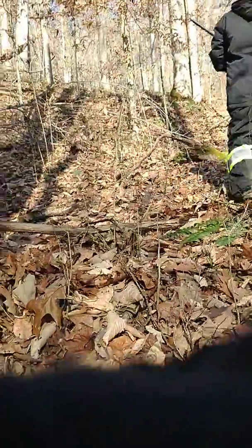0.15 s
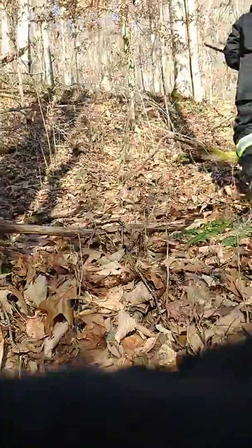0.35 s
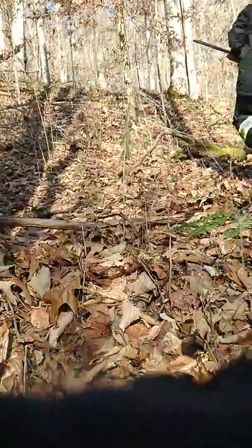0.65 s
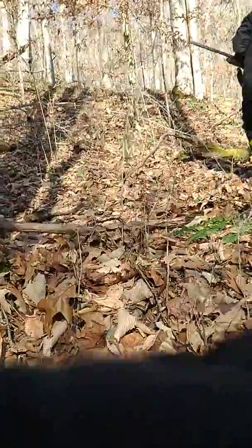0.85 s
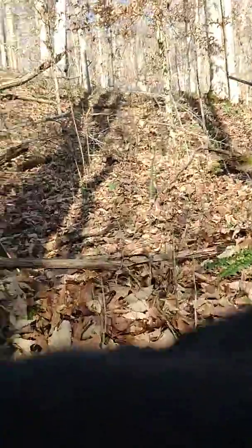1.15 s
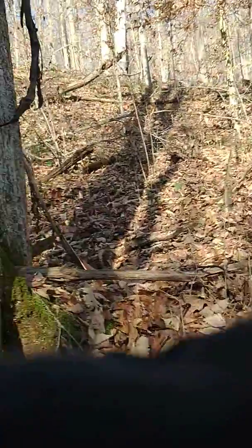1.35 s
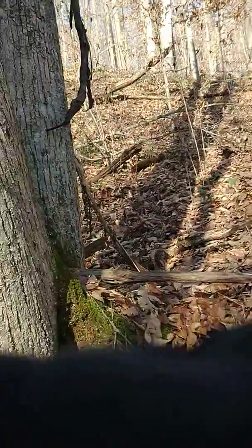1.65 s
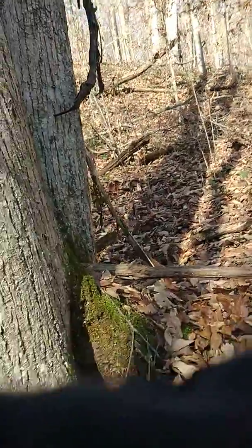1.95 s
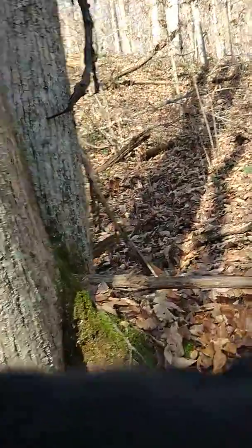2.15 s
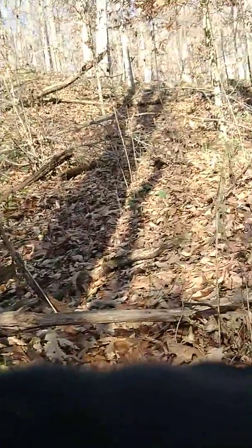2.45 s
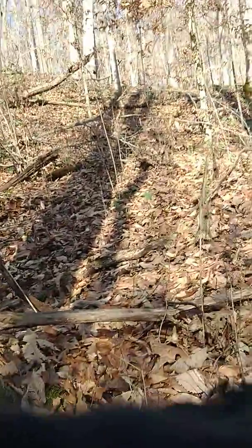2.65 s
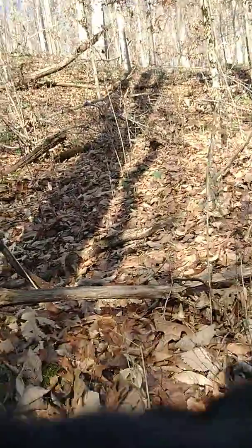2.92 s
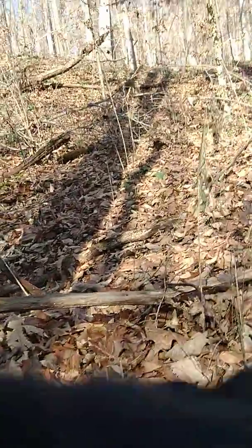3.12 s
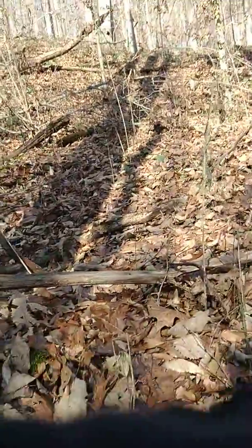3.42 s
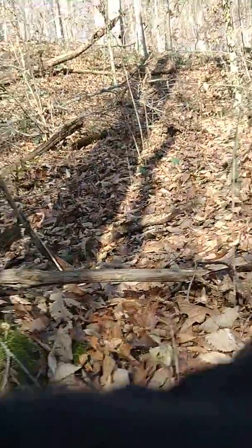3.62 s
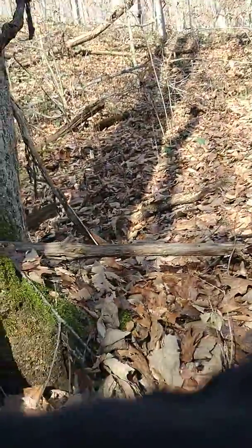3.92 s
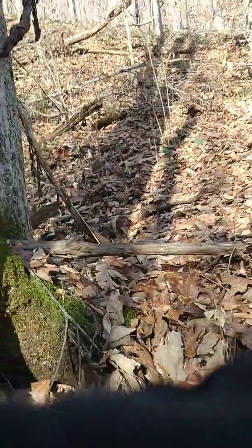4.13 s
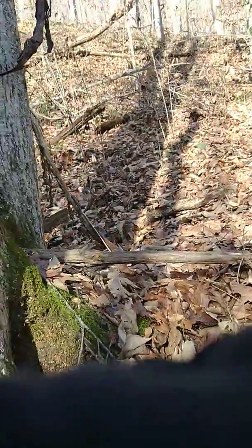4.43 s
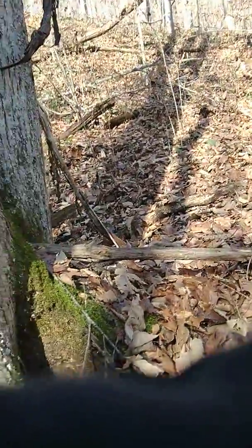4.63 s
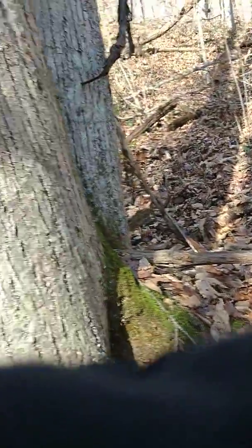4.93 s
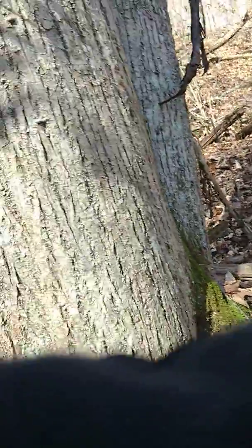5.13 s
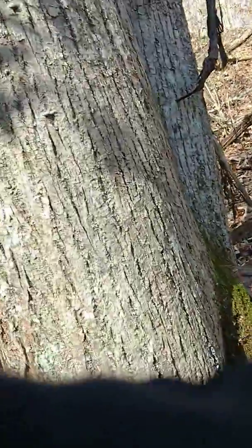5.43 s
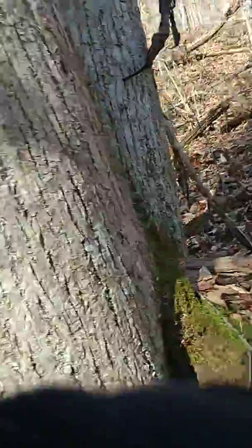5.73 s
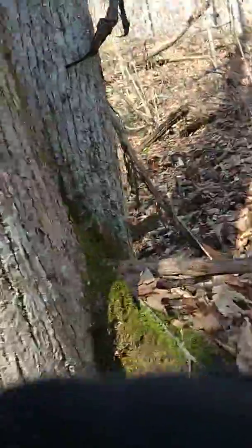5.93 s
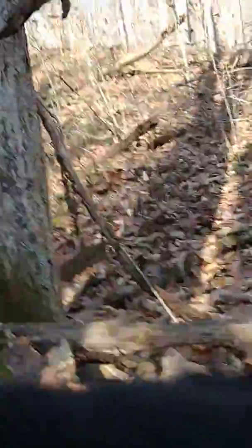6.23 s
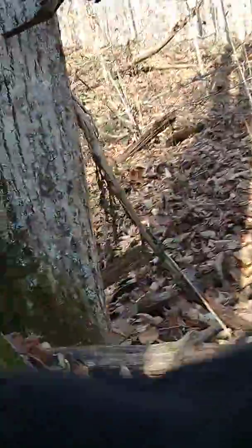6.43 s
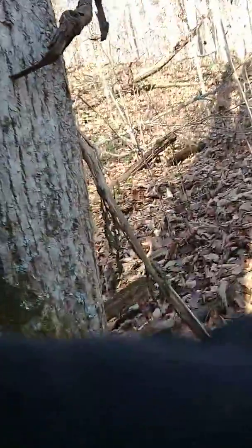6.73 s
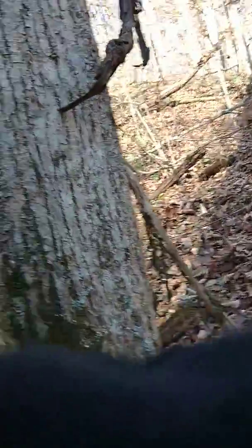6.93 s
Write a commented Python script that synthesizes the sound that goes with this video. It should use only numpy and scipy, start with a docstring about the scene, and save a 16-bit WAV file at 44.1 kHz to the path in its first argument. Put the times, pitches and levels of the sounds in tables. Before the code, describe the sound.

Uneven footsteps press and drag through brittle leaf litter, each a cluster of tiny bright fractures over a soft scuff. Sharp twig snaps and short hollow stick knocks stand out, while cloth slides and low hand bumps come from the camera itself, thickest around four seconds. Quiet forest air and a very faint short tree echo surround it; the stereo is wide, and the end is busiest.

```python
"""Shuffling through dry leaves, camera in hand

A forest floor underfoot, a camera held in a gloved hand. Each step crushes the litter into a dense
crackle of tiny fractures over a duller noise scuff; stalks snap as bursts, buried sticks knock as short tones.
The glove rubs and scrapes as shaped noise and bumps in low thuds, against the still air and a faint tree echo.
The camera's two microphones are cross-fed, each subtracting a delayed share of the other to widen the stereo."""
import sys
import numpy as np
from scipy import signal
from scipy.fft import rfft, irfft, next_fast_len
from scipy.io import wavfile
from scipy.ndimage import uniform_filter1d, map_coordinates

SR = 44100
rng = np.random.default_rng(int(sys.argv[2]) if len(sys.argv) > 2 else 0)


def materialize(psi):
    """Save the field psi as 16-bit PCM at rate SR to the path in sys.argv[1].

    A 1-D psi becomes a single channel; in a 2-D psi each row is a channel.
    """
    bounded = np.clip(np.atleast_2d(psi).T, -1, 1)
    quanta = np.round(bounded * 32767).astype(np.int16)
    wavfile.write(sys.argv[1], SR, quanta)


N = 311787

# Levels in the tables are relative: gains, filters and the microphones shift them further on.
# Boots pressing or dragging through the leaves. Each row: full weight at in seconds, rise by 20 dB in seconds,
# hold in seconds, release by 20 dB in seconds, crackle of the top leaves in dB, scuff of the packed litter in dB.
STEPS = [(-0.02, 0.19, 0.19, 0.15, -55, -49.5), (0.212, 0.1, 0.15, 0.14, -50, -50.5),
         (0.488, 0.11, 0.087, 0.21, -43.5, -45), (0.809, 0.084, 0.0058, 0.13, -51.5, -45),
         (0.918, .1, 0.13, 0.11, -63.5, -59), (1.098, 0.11, 0.33, 0.19, -51.5, -49.5),
         (1.328, 0.13, 0.01, 0.07, -45.5, -53.0), (1.596, 0.15, 0.094, 0.027, -52, -45),
         (1.777, 0.14, 0.024, 0.1, -39.5, -40), (2.012, 0.25, 0.4, 0.35, -51, -51.5),
         (2.531, 0.032, 0.038, 0.03, -35.5, -37.5), (2.598, .03, 0.018, 0.13, -57.5, -61),
         (2.865, 0.19, 0.051, 0.13, -53, -56), (2.998, 0.046, 0.088, 0.063, -55.5, -56.5),
         (3.222, 0.13, 0.17, 0.39, -55, -56), (3.486, 0.057, 0.012, 0.34, -45.5, -47.5),
         (3.878, 0.12, 0.059, 0.17, -45, -46), (3.988, 0.05, 0.15, 0.03, -55, -56),
         (4.265, 0.16, 0.069, 0.22, -43, -44.5), (4.517, 0.056, 0.11, 0.086, -40.5, -44.5),
         (4.817, 0.25, 0.067, 0.096, -57.5, -57.5), (5.133, 0.27, 0.1, 0.1, -53, -53),
         (5.254, 0.078, 0.065, 0.072, -39, -40), (5.463, 0.12, 0.06, 0.1, -54.5, -53),
         (5.56, 0.07, 0.064, 0.067, -46, -48), (5.792, 0.38, 0.18, 0.059, -57, -57.5),
         (5.995, 0.019, 0.14, 0.11, -50.5, -50.5), (6.185, 0.091, 0.053, 0.28, -46.5, -44.5),
         (6.343, 0.035, 0.035, 0.033, -40.5, -42), (6.446, 0.07, 0.029, 0.084, -40, -42.5),
         (6.507, .05, 0.062, 0.2, -49.5, -47.5), (6.672, 0.075, 0.054, 0.2, -45.5, -48.5),
         (6.844, 0.17, 0.078, 0.061, -40, -44.5), (7.004, 0.28, 0.082, 0.13, -50.5, -50)]
# Trodden leaves keep stirring between steps: resting crackle and scuff
CRACKLE_REST_DB, SCUFF_REST_DB = -89, -86
# Glove sliding on the camera. Each row: start in seconds, length in seconds, rub level in dB.
SLIDES = [(0.0, 0.65, -52.5), (0.81, 0.24, -50.5), (1.08, 0.42, -48.5), (1.53, 0.35, -47),
          (1.98, 0.56, -46.5), (3.28, 0.19, -57.5), (3.6, 0.55, -51.5), (4.2, 0.32, -47),
          (4.8, 0.56, -57.5), (5.48, 0.71, -60), (6.08, 0.18, -51), (6.45, 0.35, -55)]
# The glove's weave catching on the case. Each row: start in seconds, length in seconds, scrape level in dB.
CATCHES = [(0.26, 0.069, -47.5), (0.5, 0.022, -44), (0.68, 0.049, -50), (1.29, 0.14, -48.5),
           (1.675, 0.0079, -46), (1.77, 0.039, -39.5), (2.22, 0.22, -44.5), (2.53, 0.01, -41.5),
           (3.89, 0.049, -54), (4.52, 0.15, -54.5), (5.28, 0.036, -48.5), (5.57, 0.067, -53),
           (6.19, 0.14, -45.5)]
GRIP_RISE_S, GRIP_RELEASE_S = 0.19, 0.076  # times for the glove to change by 20 dB
GRIP_REST_DB, SCRAPE_UNDER_RUB_DB = -62, -6.5  # the resting hand; scrape that goes with every slide
# Stalks and thin twigs breaking. Each row: start in seconds, level in dB, ring in Hz,
# time to tear in seconds, left minus right in dB.
SNAPS = [(0.1374, -35.5, 8200, 0.0005, -5), (0.1418, -36, 8200, 0.00086, -3),
         (0.4592, -30, 10600, 0.00017, 7), (0.9672, -36, 10100, 0.0002, 5),
         (1.1806, -42, 10000, 0.00023, 9), (1.5033, -32.5, 9300, 0.00017, -2),
         (1.585, -40, 3200, 0.00024, 6), (1.7883, -29.5, 8300, 0.00077, -7),
         (1.9483, -33.5, 8350, 0.0005, -1), (2.127, -43, 9500, .0003, 1), (2.535, -34, 9000, 0.00051, -13),
         (2.6604, -57, 9500, .0003, 0), (2.906, -40, 9100, 0.00037, 5), (2.9388, -39.5, 10500, 0.00025, 2),
         (2.995, -44, 9000, .00025, 0), (2.9995, -38, 10800, .00022, 2), (3.0036, -38, 10000, 0.00034, 2),
         (3.023, -39, 9000, .0003, -1), (3.0896, -47, 10000, .0003, 6), (3.1911, -47, 10000, .0003, -2),
         (3.1978, -39, 10900, 0.0006, 1), (3.243, -43, 10000, .0003, -2), (3.283, -38, 9000, 0.00033, -1),
         (3.32, -38, 10500, 0.00033, -1), (3.45, -42, 9000, .0003, 1), (3.4593, -46, 12000, .0003, 1),
         (3.498, -32, 8240, 0.00054, 6), (4.5061, -38, 10500, 0.00056, 6), (4.5828, -27, 8600, 0.00031, -6),
         (5.0398, -49, 10000, .0003, 3), (5.0927, -35.5, 10000, 0.00037, -14),
         (5.525, -32.5, 10600, 0.00046, -7), (5.7537, -38, 9000, 0.00033, -5),
         (5.7616, -41, 8100, .0005, -1), (5.9978, -45, 10200, .0007, -3),
         (6.2758, -34.5, 10200, 0.00022, 6), (6.3354, -26.5, 8600, 0.00054, -10),
         (6.3366, -33, 9500, 0.0015, 1), (6.368, -34.5, 9700, 0.0013, -17),
         (6.3807, -31.5, 9900, 0.00027, -8), (6.456, -33, 10000, 0.00052, 8),
         (6.6313, -40, 10000, .0003, 2), (6.6342, -34.5, 10600, 0.00032, 9),
         (6.916, -34, 10000, 0.00018, 13)]
# The hand bumping the camera. Each row: start in seconds, level in dB, pitch in Hz before it wavers, rise in seconds.
BUMPS = [(0.828, -39.5, 136, 0.0053), (1.321, -51, 78, .009), (1.554, -41, 88.4, 0.01),
         (2.017, -29, 120, 0.0059), (2.038, -33, 97, 0.0059), (2.125, -46, 72, .008),
         (2.195, -45, 78, 0.0089), (2.892, -47, 85.5, 0.014), (3.06, -54, 80, 0.014),
         (3.298, -44, 89, 0.011), (3.641, -54, 82, .008), (3.712, -47, 157, 0.0048),
         (3.763, -39, 110, 0.0086), (3.854, -36, 74.4, 0.0085), (3.936, -45, 95, .006),
         (3.987, -35.5, 105, 0.0086), (4.027, -37.5, 99, 0.0099), (4.078, -49, 89, 0.011),
         (4.13, -41, 94, 0.0088), (4.182, -31, 130, 0.0063), (4.212, -30.5, 93, .005),
         (4.291, -52, 72, 0.0081), (4.35, -48, 83, 0.0092), (4.384, -42, 115, 0.0053),
         (5.145, -39.5, 101, 0.0088), (5.179, -43.5, 85, 0.011), (5.789, -50.5, 84, 0.0079),
         (6.091, -46.5, 87, 0.014), (6.222, -44, 100, 0.0076), (6.242, -33.5, 114, 0.0059),
         (6.261, -38.5, 134, 0.0074), (6.285, -29.5, 85, 0.0078), (6.305, -26, 115, 0.0098),
         (6.366, -35.5, 126, 0.0077), (6.685, -50, 150, .005), (6.706, -42, 175, 0.0035)]
# Buried sticks knocking underfoot; the rows at 1.504, 3.001 and 3.199 s give the low body of the stalk snaps at
# those moments. Each row: start in seconds, level in dB, pitch in Hz.
KNOCKS = [(1.262, -38.5, 450), (1.324, -32.5, 310), (1.479, -40, 356), (1.504, -44, 1610),
          (1.5854, -34, 930), (1.663, -41, 650), (1.684, -31.5, 500), (1.734, -42, 474), (1.774, -30, 500),
          (1.7929, -27, 404), (2.523, -39, 300), (2.536, -26.5, 300), (2.545, -32, 1720),
          (3.001, -47, 1190), (3.199, -53, 1120), (4.262, -38, 297), (4.875, -54, 450), (5.7631, -36, 630),
          (5.764, -38, 237), (6.074, -38, 480), (6.247, -33, 269), (6.335, -34, 600), (6.374, -37.5, 1020),
          (6.442, -38.5, 280), (6.626, -32.5, 318), (6.69, -37, 403), (6.791, -32.5, 340),
          (6.941, -36, 270)]

# Spectra, of which only the shape counts. Each row: frequency in Hz, level in dB per Hz.
# Dry top leaves
LEAF_SPECTRUM = [(300, -24.5), (900, -6.5), (1600, -8.5), (2300, -4), (3400, -7), (5600, -7.5),
                 (8200, -1.5), (10200, 1.5), (12200, -3.5), (15000, 1.5)]
# Packed litter beneath
LITTER_SPECTRUM = [(90, -12), (250, 2.5), (450, 0), (750, -1.5), (1100, -3), (1600, -4.5), (2300, -17),
                   (5000, -21.5)]
# Cloth rubbing on the case
CLOTH_SPECTRUM = [(25, -54), (45, 0.5), (65, -6), (125, 1.5), (170, -2), (230, 1), (290, -3), (420, -22),
                  (800, -24), (2000, -62)]
# Weave scraping on the case
SCRAPE_SPECTRUM = [(120, -28.5), (280, 4), (420, 7.5), (560, -3), (800, -5), (1400, -17.5), (4000, -50)]
# Stalks and whole leaves cracking
CRACK_SPECTRUM = [(400, -36), (1500, -1.5), (3500, -6), (6500, 0.5), (10500, 3.5), (15000, 6.5)]
# Still air of the wood
FOREST_SPECTRUM = [(25, -51), (45, 21), (70, -2.5), (200, 21.5), (400, 5), (1000, -24), (3000, -27),
                   (15000, -31)]

# Likeness of the two microphones. Each row: frequency in Hz, likeness from 0 to 1.
LIKENESS = [(200, 0.77), (400, 0.75), (750, 0.18), (1200, 0.27), (1700, 0.44), (2400, 0.84), (7000, 0.0053),
            (15000, 0.013)]
# Colour of the microphone ports. Each row: frequency in Hz, left minus right in dB.
PORTS = [(100, 7), (200, 3.5), (400, 1.5), (750, -4), (1200, -1.5), (1700, -1), (3600, -9.5), (6100, 4.5),
         (7300, 5.5), (10200, 9.5), (12500, 4), (14800, -2.5)]
# Cross-feed between channels. Each row: frequency in Hz, share taken from the other channel from 0 to 1.
CROSSFEED = [(200, 0.58), (400, 0.5), (750, 0.42), (1200, 0.62), (1700, 0.6), (2350, .9), (3600, 0.7),
             (4800, .97), (6100, 0.7), (7300, 0.45), (10200, 0.27), (15000, 0.24)]
LEFT_LAG_S, CROSS_DELAY_S = .00034, .000414
LOW_CUT_HZ, TOP_HZ = 51, 15520


def amp(db):
    """Decibels to gain."""
    return 10 ** (np.asarray(db) / 20)


def unit(x):
    """Scaled to rms 1."""
    return x / np.sqrt(np.mean(x ** 2) + 1e-20)


def along(points, hz):
    """(Hz, value) points read on a log axis."""
    f, v = np.transpose(points)
    return np.interp(np.log(hz + 1), np.log(f + 1), v)


def noise():
    """Two unrelated white noises."""
    return rng.standard_normal((2, N))


def wobble(rate):
    """A smooth random curve of rms 1, rate knots a second."""
    knots = rng.standard_normal(int(N * rate / SR) + 4)
    return unit(map_coordinates(knots, [np.arange(N) * rate / SR]))


def filtered(x, response):
    """x times a complex response of frequency."""
    m = next_fast_len(N + SR // 2)
    return irfft(rfft(x, m) * response(np.fft.rfftfreq(m, 1 / SR)), m)[..., :N]


def coloured(x, spectrum, size=4096):
    """Both channels through a causal minimum-phase filter of energy 1 with the given spectrum."""
    gain = amp(along(spectrum, np.fft.rfftfreq(size, 1 / SR)))
    cepstrum = irfft(np.log(gain))
    # folding the cepstrum forward in time makes the filter causal
    cepstrum[1:size // 2] *= 2
    cepstrum[size // 2 + 1:] = 0
    response = irfft(np.exp(rfft(cepstrum)))
    response = response / np.linalg.norm(response)
    return signal.fftconvolve(x, response[None], axes=1)[:, :N]


def add(track, s, sound):
    """Mixes a sound into a track at time s."""
    part = track[..., round(s * SR):][..., :sound.shape[-1]]
    part += sound[..., :part.shape[-1]]


def strokes(rows, rest_db):
    """Level in dB of overlapping strokes (s, rise s, hold s, release s, dB) above a resting level."""
    t = np.arange(N) / SR
    power = np.full(N, amp(rest_db) ** 2)
    for s, rise, hold, release, db in rows:
        # distance from the hold, in units of 20 dB
        outside = np.maximum(s - t, 0) / rise + np.maximum(t - s - hold, 0) / release
        near = outside < 2
        power[near] += amp(db - 20 * outside[near]) ** 2
    return 10 * np.log10(power)


def crackle_level():
    """Level in dB of the top leaves under the boots."""
    return strokes([(*timing, crackle) for *timing, crackle, scuff in STEPS], CRACKLE_REST_DB)


def scuff_level():
    """Level in dB of the packed litter under the boots."""
    return strokes([(*timing, scuff) for *timing, crackle, scuff in STEPS], SCUFF_REST_DB)


def fractures(rate, spread_db, top_hz, life, size=64):
    """Tiny breaks at random, few of them big; each rings briefly at its own pitch, a little to one side."""
    when, tone, force, side, *phases = rng.random((int(rate * N / SR), 6)).T[:, :, None]
    t = np.arange(size) / SR
    at = ((when * (N - size)).astype(int) + np.arange(size)).ravel()
    fade = amp(-spread_db * np.log(force + 1 / 100)) * t / life * np.exp(-t / life)
    channels = []
    for share, phase in zip([.5 + side, 1.5 - side], phases):
        rings = fade * share * np.sin(2 * np.pi * (tone * top_hz * t + phase))
        channels.append(np.bincount(at, rings.ravel(), N))
    return unit(np.array(channels))


def collapses(rate, t60):
    """Leaves cave in suddenly and settle: a random curve of rms 1 with steep rises and slower falls."""
    kicks = (rng.random(N) < rate / SR) * rng.uniform(0.29, 1, N)
    caving = signal.lfilter([1], [1, -amp(-60 / (t60 * SR))], kicks)
    return unit(caving - caving.mean())


def patchy(x, depth_db, size=256):
    """Every leaf has its own tone: random gain patches some 800 Hz wide and 15 ms long."""
    z = signal.stft(x, nperseg=size)[2]
    field = rng.standard_normal(z.shape[1:])
    field = uniform_filter1d(field, size=5, axis=0)
    field = uniform_filter1d(field, size=5, axis=1)
    gain = unit(amp(depth_db * unit(field)))
    return signal.istft(z * gain, nperseg=size)[1][:, :N]


def steps():
    """Leaves give way in clumps under the boot: bright fractures over a rustle, a scuff from the layer beneath."""
    clumps = collapses(rate=90, t60=0.061)
    top = amp(-1.5) * noise()
    top += amp(-7.0) * fractures(rate=1100, spread_db=3.0, top_hz=15970, life=.00008)
    top *= amp(crackle_level() + 2 + 0.89 * clumps + 0.14 * wobble(310))
    below = amp(-6.0) * noise()
    below += amp(-15.5) * fractures(rate=450, spread_db=0.5, top_hz=2022, life=0.00076, size=300)
    below *= amp(scuff_level() - 2.5 + 0.6 * clumps + 0.26 * collapses(rate=110, t60=0.026))
    crunch = coloured(top, LEAF_SPECTRUM) + coloured(below, LITTER_SPECTRUM)
    return patchy(crunch, depth_db=2.0)


def flakes(under_db=-13):
    """Now and then a whole leaf breaks under the boot and stands out of the crackle."""
    breaks = fractures(rate=110, spread_db=1.5, top_hz=13000, life=.00013)
    return amp(crackle_level() + under_db) * coloured(breaks, CRACK_SPECTRUM)


def settling(tick_db=-69):
    """Bent leaves spring back with small, bright, separate ticks, heard between the steps."""
    ticks = fractures(rate=45, spread_db=1.5, top_hz=16000, life=.0001)
    return amp(tick_db) * coloured(ticks, LEAF_SPECTRUM)


def trunks(x, t60=0.061, build_s=0.0018, size=4096):
    """The trees scatter a faint, short echo; its pattern changes every 93 ms as walker and camera move."""
    echo = np.zeros((2, N))
    t = np.arange(size) / SR
    for start in range(0, N, size):
        tail = rng.standard_normal((2, size)) * amp(-60 * t / t60) * (1 - np.exp(-t / build_s))
        tail /= np.linalg.norm(tail[0])
        add(echo, start / SR, signal.fftconvolve(x[:, start:start + size], tail, axes=1))
    return echo


def grip(rows, rest_db):
    """Level in dB of the glove's movements (s, length s, dB), all with the same rise and release."""
    return strokes([(s, GRIP_RISE_S, length, GRIP_RELEASE_S, db) for s, length, db in rows], rest_db)


def glove():
    """Cloth slides on the camera's case with a dull rub, and scrapes where its weave catches."""
    rub_db = grip(SLIDES, GRIP_REST_DB)
    catch_db = grip(CATCHES, rest_db=-84)
    rub = amp(rub_db + 2.0 + 1.36 * wobble(35)) * noise()
    grab = np.hypot(amp(catch_db), amp(rub_db + SCRAPE_UNDER_RUB_DB))
    grain = noise() + amp(-14.5) * fractures(rate=350, spread_db=4.5, top_hz=1700, life=0.00053, size=200)
    scrape = grab * amp(-8.5 + 0.79 * wobble(50)) * grain
    return coloured(rub, CLOTH_SPECTRUM) + coloured(scrape, SCRAPE_SPECTRUM)


def forest_air():
    """The still air of the wood: steady noise, unrelated in the two channels."""
    return amp(-63.0) * coloured(noise(), FOREST_SPECTRUM)


def snaps(splinter_t60=0.053, splinter_db=-21, ring_db=-1, sharpness=3):
    """A stalk tears in one short burst of fibres with a tail of splinters, all tinted by its own brief ring."""
    cracks = np.zeros((2, N))
    t = np.arange(SR // 10) / SR
    for s, db, hz, tear, pan_db in SNAPS:
        fade = t / tear * np.exp(1 - t / tear) + amp(splinter_db - 60 * t / splinter_t60)
        fibres = rng.choice([-1, 1], (2, len(t)))
        ring = signal.lfilter(*signal.iirpeak(hz, sharpness, fs=SR), fibres)
        burst = fade * (fibres + amp(ring_db) * ring)
        # the ring changes the tint, not the energy
        burst *= np.linalg.norm(fade) / np.linalg.norm(burst, axis=1, keepdims=True)
        pan = pan_db * np.array([[.5], [-.5]])
        add(cracks, s, amp(db + pan) * burst)
    return coloured(cracks, CRACK_SPECTRUM)


def bumps(waver=0.29, overtone_db=-8):
    """Soft, uneven thuds of the hand, which press on the left microphone: low tones of wavering pitch."""
    thuds = np.zeros(N)
    t = np.arange(SR // 5) / SR
    drift = wobble(170)
    for s, db, hz, rise in BUMPS:
        local_drift = np.roll(drift, -round(s * SR))[:len(t)]
        phase = 2 * np.pi * np.cumsum(hz * np.exp(waver * local_drift)) / SR
        push = np.sin(phase) + amp(overtone_db) * np.sin(1.255 * phase)
        add(thuds, s, amp(db + 5.0) * t / rise * np.exp(1 - t / rise) * push)
    return np.array([thuds, amp(-60) * thuds])


def knocks(t60=0.015, puff_db=-1, wood_db=-3, sharpness=1.0):
    """A stick under the litter, or the body of a snapping stalk, gives a woody knock of a few cycles and a
    broad puff around the same pitch."""
    wood, puffs = np.zeros(N), np.zeros((2, N))
    t = np.arange(SR // 10) / SR
    for s, db, hz in KNOCKS:
        fade = amp(db - 60 * t / t60)
        add(wood, s, amp(wood_db) * fade * np.sin(2 * np.pi * hz * t))
        band = signal.iirpeak(hz, sharpness, fs=SR)
        puff = rng.standard_normal((2, len(t)))
        for _ in range(2):
            puff = signal.lfilter(*band, puff)
        add(puffs, s, amp(puff_db) * fade * unit(puff))
    return np.array([amp(-5) * wood, wood]) + puffs


def at_microphones(x):
    """The left microphone gets a partly alike sound, later than the right: its own noise and the right's, mixed."""
    def left_mix(hz):
        alike = np.clip(along(LIKENESS, hz), 0, 1)
        return np.array([np.sqrt(1 - alike ** 2), alike]) * np.exp(-2j * np.pi * hz * LEFT_LAG_S)

    left = filtered(x, left_mix).sum(0)
    return np.array([left, x[1]])


def scene():
    """Feet, hand and the still air of the wood, as they reach the two microphones."""
    feet = steps() + flakes() + settling() + snaps() + knocks()
    echo = amp(-6.5) * trunks(feet)
    return at_microphones(feet + echo + glove() + forest_air()) + bumps()


def record(dry):
    """Ports colour each side; channels subtract a delayed share of each other; both ends of the range are cut."""
    def port_gain(hz):
        return amp(along(PORTS, hz) * np.array([[.5], [-.5]]))

    def feed(hz):
        return np.clip(along(CROSSFEED, hz), 0, 1) * np.exp(-2j * np.pi * hz * CROSS_DELAY_S)

    ports = filtered(dry, port_gain)
    wide = ports - filtered(ports[::-1], feed)
    low_cut = signal.butter(4, LOW_CUT_HZ, "highpass", fs=SR, output="sos")
    wide = signal.sosfilt(low_cut, wide)
    return filtered(wide, lambda hz: hz < TOP_HZ)


dry = scene()
out = record(dry)
materialize(out)
```